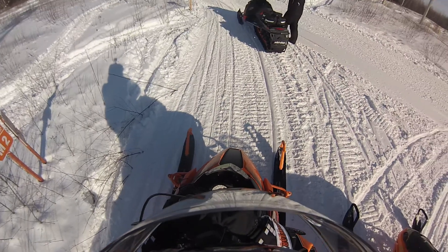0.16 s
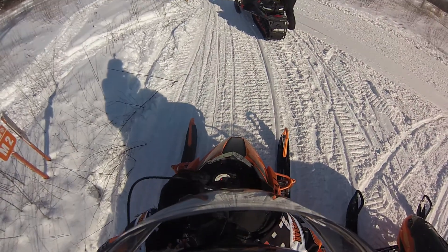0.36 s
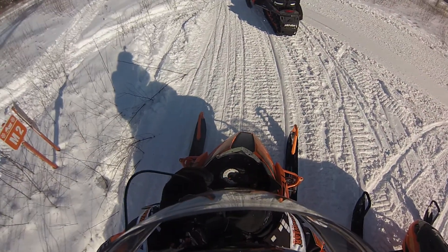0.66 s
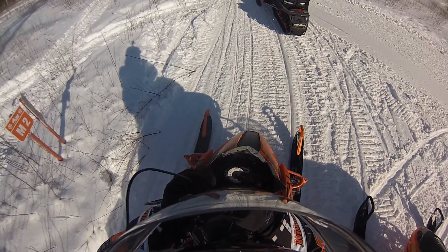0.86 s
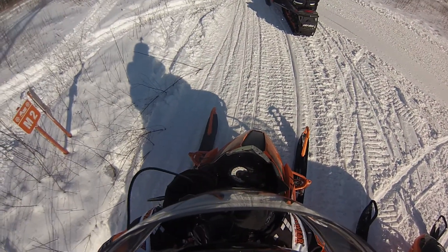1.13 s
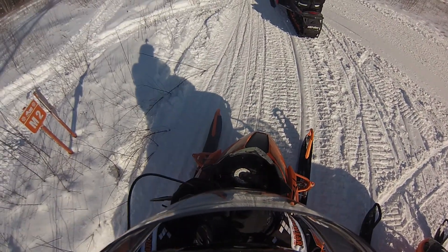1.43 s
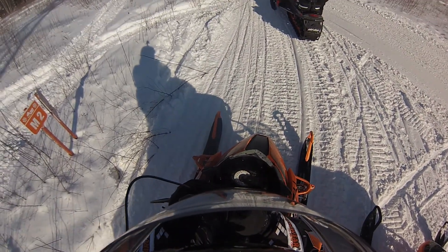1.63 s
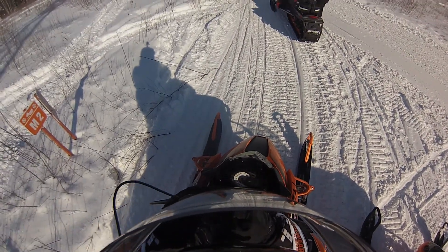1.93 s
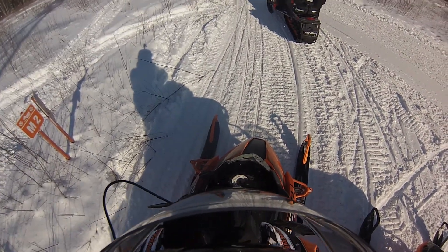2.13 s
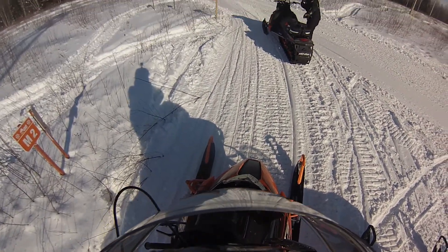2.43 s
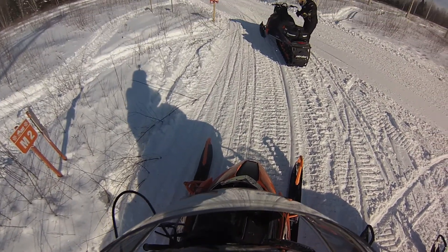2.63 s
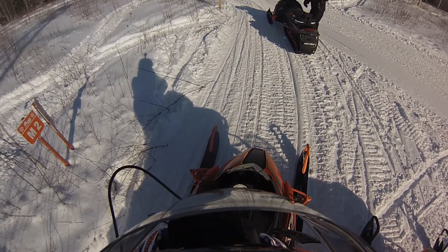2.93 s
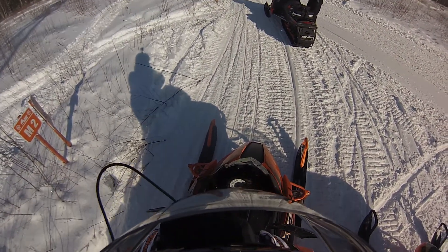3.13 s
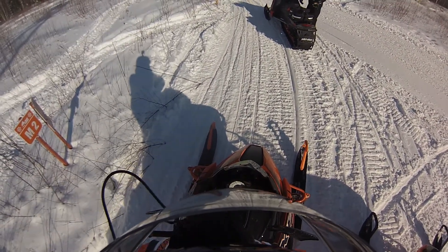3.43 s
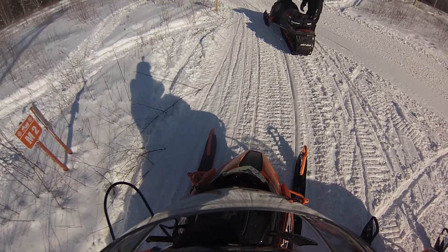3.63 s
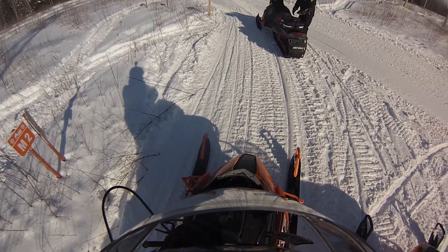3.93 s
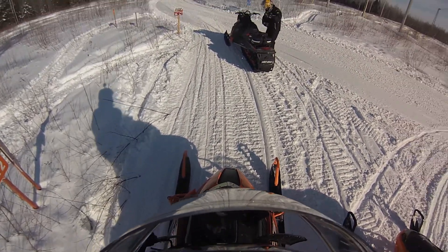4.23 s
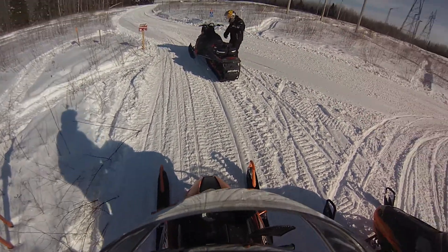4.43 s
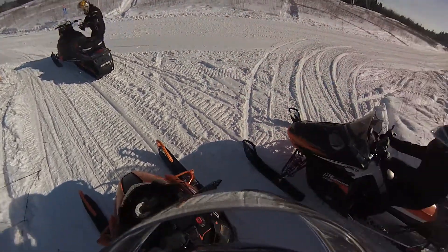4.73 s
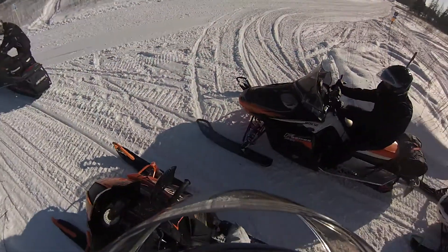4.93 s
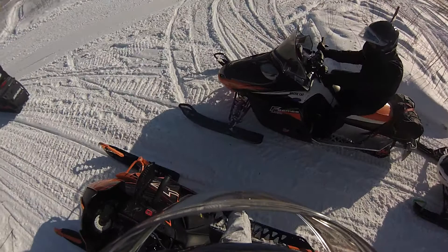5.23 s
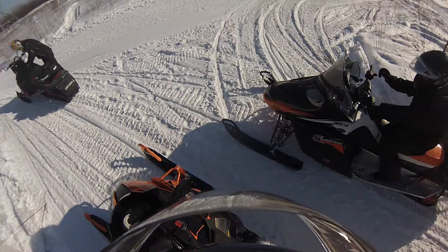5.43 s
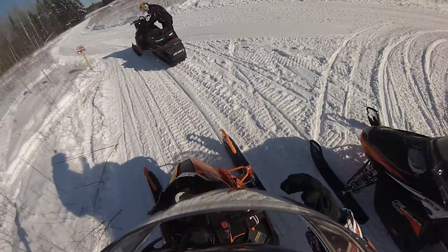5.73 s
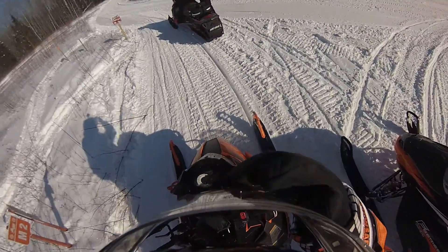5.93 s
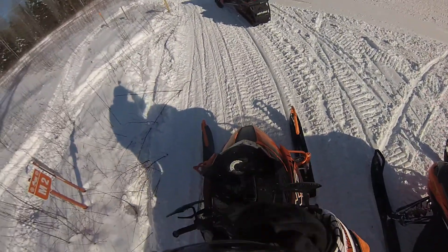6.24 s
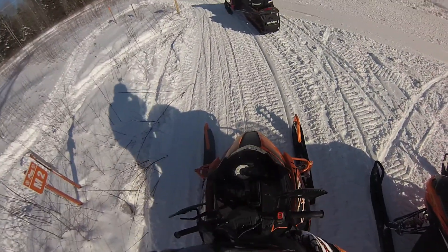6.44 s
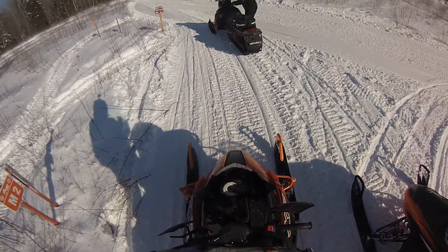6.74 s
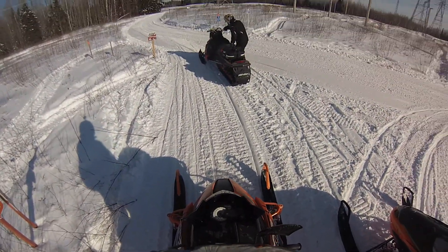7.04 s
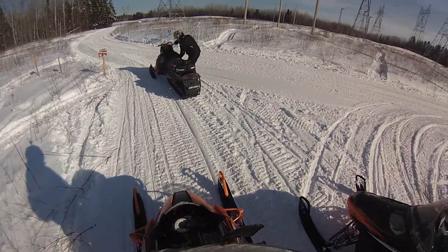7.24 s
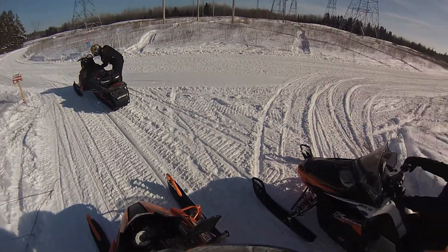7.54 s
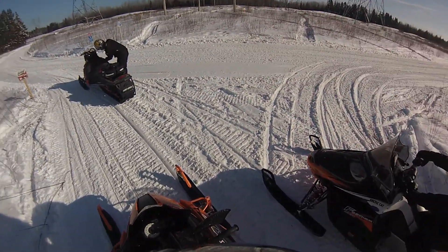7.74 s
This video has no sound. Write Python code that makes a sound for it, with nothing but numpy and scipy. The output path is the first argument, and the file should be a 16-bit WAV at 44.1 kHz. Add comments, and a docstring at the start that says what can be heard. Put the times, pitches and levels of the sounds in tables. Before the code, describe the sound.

Two snowmobiles idle with a low throb and metallic rattle, then a helmet visor ratchets down and snaps shut loudly, very close.

```python
"""On a trail, two snowmobiles idle, heard from a camera on one rider's helmet.
The rider's own engine throbs as exhaust pulses ring its pipe and silencer; a second machine clatters
and whines close by. The rider looks round, and stick-slip friction makes the helmet rub and judder on
the jacket. A hand takes the visor, rocking the camera mount, and pulls it down over its ratchet, each
tooth ringing the helmet shell, until it snaps shut. Then the rider looks round again."""
import sys
import numpy as np
from scipy import signal
from scipy.fft import rfft, irfft, next_fast_len
from scipy.io import wavfile
from scipy.ndimage import map_coordinates

SR = 44100
rng = np.random.default_rng(int(sys.argv[2]) if len(sys.argv) > 2 else 0)


def put_to_file(sound):
    """Save the sound as 16-bit audio at rate SR, in the file named by the first command-line argument."""
    columns = np.atleast_2d(sound).T  # one column per channel
    safe = np.clip(columns, -1, 1)
    whole_steps = np.round(safe * 32767)
    wavfile.write(sys.argv[1], SR, whole_steps.astype(np.int16))


N = 347067
TIME = np.arange(N) / SR


def gain_of(db):
    """Amplitude ratio: a factor of ten for every 20 dB."""
    return 10 ** (np.asarray(db) / 20)


def unit_rms(x):
    """Normalisation to a mean power of one."""
    return x / np.sqrt(np.mean(x ** 2) + 1e-20)


def follow(curve):
    """Linear interpolation of (time_s, value) points at every sample."""
    return np.interp(TIME, *np.transpose(curve))


def add(mix, start_s, sound):
    """Superposition: a sound sums into the mix from its start time."""
    part = mix[round(start_s * SR):][:len(sound)]
    part += sound[:len(part)]


def noise():
    """White Gaussian noise: equal power per hertz."""
    return rng.standard_normal(N)


def wander(rate_hz):
    """Slow random modulation of rms 1, interpolated between independent values."""
    knots = rng.standard_normal(2000)
    return unit_rms(map_coordinates(knots, [TIME * rate_hz], order=1, mode="wrap"))


def spectrum(points, hz):
    """Spectral envelope over log frequency, falling 24 dB an octave above its last point."""
    points_hz, db = np.transpose(points)
    octaves_above = np.maximum(np.log2((hz + 1) / points_hz[-1]), 0)
    return gain_of(np.interp(np.log(hz + 1), np.log(points_hz + 1), db) - 24 * octaves_above)


def colour(x, points, size=4096):
    """Minimum-phase filter of unit energy: by causality, nothing sounds before the blow."""
    hz = abs(np.fft.fftfreq(size, 1 / SR))
    log_gain = np.log(np.maximum(spectrum(points, hz), 1e-5))
    response = np.exp(np.conj(signal.hilbert(log_gain)))
    taps = np.fft.ifft(response).real[:size // 2]
    return signal.oaconvolve(x, taps / np.linalg.norm(taps))[:len(x)]


def ring(modes):
    """Free vibration: one second of exponentially damped modes."""
    t = TIME[:SR]
    return sum(gain_of(db - 60 * t / t60) * np.sin(2 * np.pi * hz * t) for hz, db, t60 in modes)


def struck(blows, modes):
    """Linear response: blows convolved with the impulse response of the modes."""
    return signal.oaconvolve(blows, ring(modes))[:N]


def strikes(turns, scatter_db):
    """Impulse train: one blow of uneven strength at each whole turn."""
    impulses = np.diff(np.floor(turns), prepend=np.floor(turns[0]))
    return impulses * gain_of(scatter_db * np.clip(noise(), -2, 2))


def pulses(turns, decay_turns):
    """Periodic envelope: a jump to 1 at each whole turn, then exponential decay."""
    return np.exp(-(turns % 1) / decay_turns)


def exhaust(cycles, drone_db=-51.5, puff_db=-77.0):
    """Interference: one hard beat a cycle rings the silencer against a pipe drone, so it throbs."""
    # pipe modes rung by the beat: pitch_hz, level_db, t60_s
    pipe_modes = [(154, -66.5, 0.058), (205, -83, 0.035), (252, -79.5, .063), (322, -79, .03),
                  (398, -79, .036)]
    # deep mode of the silencer: pitch_hz, level_db, t60_s
    silencer_modes = [(105.7, -45, 0.12)]
    # spectrum of the gas puff: frequency_hz, gain_db
    puff_spectrum = [(120, -26.5), (190, 13), (250, -1.5), (330, 7), (400, 8), (480, -29.5), (700, -27)]
    firing = cycles + .031
    beat_phase = firing + .04
    drone = np.cos(2 * np.pi * 10 * firing + .08 * wander(11))  # tenth harmonic of the cycle
    drone *= gain_of(drone_db + 0.57 * wander(8.5))
    throb = struck(strikes(firing, scatter_db=1.37), silencer_modes)
    beat = struck(strikes(beat_phase + .016 * wander(17), scatter_db=1.5), pipe_modes)
    puff = colour(noise() * (pulses(beat_phase, 0.084) + 0.48), puff_spectrum)
    return gain_of(puff_db) * unit_rms(puff) + drone + throb + beat


def panels(drive, modes):
    """Forced vibration: broad panel resonances filter a drive; the result has rms 1."""
    size = next_fast_len(N)
    hz = np.fft.rfftfreq(size, 1 / SR)
    power = sum(gain_of(db) ** 2 / (1 + ((hz - f) / width) ** 2) ** 2 for f, width, db in modes)
    return unit_rms(irfft(rfft(drive, size) * np.sqrt(power), size)[:N])


def panel_rattle(shaft_turns, own_db=-75.0):
    """Amplitude modulation: two knocks a shaft turn pulse the noise in both machines' panels."""
    # panel resonances of each machine: centre_hz, half_width_hz, gain_db
    own_panels = [(795, 110, -3), (1512, 50, -1), (1531, 68, 1), (2028, 145, -0.5), (2505, 49, -4.5),
                  (3134, 140, -27.5), (3430, 83, -18.5), (3910, 32, -21.5), (4540, 180, -27.5),
                  (4840, 70, -29.5)]
    neighbour_panels = [(354, 90, -1), (820, 140, -10.5), (1447, 76, 1.5), (1596, 75, 2), (2020, 257, -7.5),
                        (2490, 58, -5), (3370, 140, -8), (4660, 490, -20), (5240, 110, -24.5),
                        (6570, 210, -28), (7360, 950, -28)]
    # the neighbour's rattle at the helmet: time_s, level_db
    neighbour_level = [(4.1, -81), (4.4, -77), (4.8, -70), (5.5, -66), (7.87, -67)]
    knocks = pulses(shaft_turns, 0.2) + 0.98 * pulses(shaft_turns - .7, 0.18)
    knocks *= gain_of(wander(30))
    own = panels(noise() * (1 + 0.56 * knocks), own_panels)
    neighbour = panels(noise() * (1 + 0.83 * knocks), neighbour_panels)
    return gain_of(own_db + .5 * wander(4.6)) * own + gain_of(follow(neighbour_level)) * neighbour


def metal_clatter(cycles, shaft_turns):
    """Impact excitation: the rider's valve gear and the neighbour's pistons and tappets ring metal."""
    # modes of the struck parts: pitch_hz, level_db, t60_s
    valve_modes = [(2020, -73.5, 0.034), (2280, -78, 0.042), (2430, -87, 0.029)]
    piston_modes = [(1406, -75, 0.11), (1536, -72, 0.085), (3050, -83.5, .04)]
    tappet_modes = [(3285, -82.5, 0.048), (4184, -79.5, 0.033), (4930, -83, 0.0368)]
    # play in the parts lets blows land a little early or late
    valves = strikes(cycles - .81 + 0.0081 * wander(13), scatter_db=3)
    valves += 0.45 * strikes(cycles - .44, scatter_db=4.5)
    pistons = strikes(shaft_turns + .04 * wander(30), scatter_db=1.5)
    tappets = strikes(shaft_turns - .72 + .02 * wander(27), scatter_db=2.5)
    return struck(valves, valve_modes) + struck(pistons, piston_modes) + struck(tappets, tappet_modes)


def gear_whine(pitch_hz=803, waver_share=0.00993):
    """Frequency modulation: the neighbour's thin gear tone wavers about its pitch."""
    # strength of the whine: time_s, rms_db
    whine_level = [(0, -87.5), (4.5, -87.5), (5.4, -81), (7.87, -81)]
    turns = np.cumsum(pitch_hz * (1 + waver_share * wander(22))) / SR
    return np.sqrt(2) * gain_of(follow(whine_level) + 2 * wander(22)) * np.sin(2 * np.pi * turns)


def rumble(level_db=-60):
    """Broadband noise: the low rumble of the idling machines under a thin hiss."""
    # spectral density of rumble and hiss: frequency_hz, gain_db
    density = [(12, -18.5), (22, -2.5), (31, 0.5), (42, -13), (60, -17.5), (130, -7), (220, -32.5),
               (380, -35), (520, -39), (1100, -40), (2900, -47), (5300, -50), (6500, -54.5), (12700, -55.5)]
    shaped = irfft(rfft(noise()) * spectrum(density, np.fft.rfftfreq(N, 1 / SR)), N)
    return gain_of(level_db + 0.37 * wander(21)) * unit_rms(shaped)


def padding_bumps():
    """Damped resonance: light blows on the helmet padding ring two low, dull modes."""
    # blows on the padding: time_s, level_db
    bumps = [(0.936, -66.5), (1.453, -59.5)]
    # modes of the padding: pitch_hz, gain_db, t60_s
    padding_modes = [(259.7, 2.5, 0.13), (322, -8, 0.084)]
    blows = np.zeros(N)
    for time_s, db in bumps:
        add(blows, time_s, gain_of([db]))
    return struck(blows, padding_modes)


def click(t60_s, grit):
    """Contact transient: an impulse followed by exponentially decaying chatter."""
    t = TIME[:3000]
    burst = grit * rng.standard_normal(len(t)) * gain_of(-60 * t / t60_s)
    burst[0] += 1
    return burst


def camera_case(contact):
    """Structure-borne sound: resonances of the camera case sharpen whatever touches the helmet."""
    # case resonances, added to the direct sound: centre_hz, width_hz, gain_db
    resonances = [(1634, 190, 4), (1986, 130, 4), (4630, 223, 13), (5310, 150, 4.5), (6590, 180, 2),
                  (7900, 200, 0), (8980, 250, 8), (11800, 360, -7)]
    return contact + sum(gain_of(db) * signal.lfilter(*signal.iirpeak(hz, hz / width, fs=SR), contact)
                         for hz, width, db in resonances)


def fitting_ticks(ring_db=-13, ring_t60_s=0.022):
    """Light impacts: loose plastic fittings knock, each ringing briefly at its natural frequency; one sharp
    crackle of the jacket sounds alike."""
    # knocks of the fittings, and at 4.936 s a sharp crackle of the jacket: time_s, level_db, pitch_hz
    knocks = [(1.0855, -55, 3570), (2.221, -43.5, 2410), (2.797, -51, 2200), (3.5538, -51, 4700),
              (4.223, -51, 2080), (4.72, -49, 4650), (4.936, -40, 4540), (5.964, -47, 2050),
              (5.985, -44, 1570)]
    # spectrum of a knock: frequency_hz, gain_db
    knock_spectrum = [(300, -53), (1100, -47), (1500, 2.5), (2300, 14.5), (3100, 1), (3900, -7), (4700, -9),
                      (5500, -7), (6500, -11), (9000, -31), (13000, -10)]
    drive, rings = np.zeros((2, N))
    for time_s, db, hz in knocks:
        add(drive, time_s, gain_of(db) * click(t60_s=0.027, grit=0.22))
        add(rings, time_s, gain_of(db) * ring([(hz, ring_db, ring_t60_s)]))
    return camera_case(colour(drive, knock_spectrum)) + rings


def strokes(rows, swell_share=0.22, release_share=0.32):
    """Friction envelope: each stroke swells linearly, holds, then decays exponentially."""
    level = np.zeros(N)
    for start_s, length_s, db in rows:
        progress = (TIME - start_s) / length_s
        swell = np.clip(progress / swell_share, 0, 1)
        release = np.exp(-np.maximum(progress - 1, 0) / release_share)
        level += gain_of(db) * swell * release
    return level


def jacket_rub(grain_db=4.5, flutter_db=0.45):
    """Sliding friction: nylon threads fizz under the helmet and its padding scrapes the collar."""
    # strokes over the nylon and over the collar: start_s, length_s, level_db
    slides = [(4.71, 0.046, -61), (4.8, 0.38, -58), (5.958, 0.034, -62), (7.13, 0.22, -70)]
    scrapes = [(4.9, 0.13, -63.5), (5.03, 0.17, -67), (5.965, 0.048, -56.5), (7.13, 0.15, -62)]
    # friction spectra: frequency_hz, gain_db
    nylon_spectrum = [(200, 1.5), (500, -4.5), (1100, -7.5), (1500, -1), (1850, -3.5), (2450, -0.5),
                      (2800, -19.5), (3600, -7.5), (4200, -18), (4650, -17), (5100, -27), (7500, -24.5),
                      (10000, -34), (12000, -27), (14000, -40.5)]
    collar_spectrum = [(150, -23), (300, -2.5), (400, -2.5), (470, 7), (505, -11), (550, -16.5), (700, -20)]
    threads = noise() * gain_of(grain_db * np.minimum(rng.exponential(1, N), 6) + flutter_db * wander(90))
    fizz = strokes(slides) * unit_rms(camera_case(colour(threads, nylon_spectrum)))
    scrape = strokes(scrapes) * unit_rms(colour(noise(), collar_spectrum))
    return fizz + scrape


def helmet_judder(drag_hz=45.5, sway_hz=37.2, rise_db_per_s=100, fall_db_per_s=84):
    """Stick-slip oscillation builds as the head turns, then slows to the mount's free sway and dies."""
    # height of the judder at the end of each head turn: time_s, rms_db
    head_turns = [(5.162, -36), (7.365, -34.5)]
    judder = np.zeros(N)
    for peak_s, db in head_turns:
        t = TIME - peak_s
        dragging = .5 * (1 - np.tanh((t + .04) / .02))  # falls from 1 to 0 about 40 ms before the peak
        turns = np.cumsum(sway_hz + (drag_hz - sway_hz) * dragging) / SR
        turns -= np.interp(peak_s, TIME, turns)
        level_db = db + np.minimum(rise_db_per_s * t, -fall_db_per_s * t)
        judder += np.sqrt(2) * gain_of(level_db) * np.cos(2 * np.pi * turns)
    return judder


def mount_rocking():
    """Mass on a spring: the camera rocks on its mount after each push of the hand."""
    # pushes of the hand: start_s, level_db, rise_s
    pushes = [(6.008, -25.5, 0.034), (6.255, -11.5, 0.0225)]
    # modes of the mount: pitch_hz, gain_db, t60_s
    mount_modes = [(37.4, -2.5, 0.7), (44, 9, 0.15), (59.5, -12, 0.39), (83, -23, 0.2), (117.2, -27, 0.79)]
    rocking = np.zeros(N)
    for start_s, db, rise_s in pushes:
        onset = 1 - np.exp(-(TIME[:SR] / rise_s) ** 2)
        add(rocking, start_s, gain_of(db) * ring(mount_modes) * onset)
    return rocking


def visor(slip_db=-35.5, slip_edge_hz=3050, bite_s=.001, latch_s=6.3318):
    """Friction and impact: the visor rubs and skips over its ratchet, driving the shell, and latches."""
    # the visor skips over the teeth, catches, snaps home and rebounds: time_s, level_db
    clicks = [(6.2514, -20), (6.2616, -18.5), (6.275, -12.5), (6.2933, -15), (6.3054, -17.5),
              (6.3198, -17.5), (6.329, -11), (6.332, -6.5), (6.339, -20)]
    # response of the helmet shell: frequency_hz, gain_db
    shell_spectrum = [(90, -1.5), (200, 4.5), (340, -3), (450, 7), (600, -13.5), (1050, -12.5),
                      (1350, -7.5), (1520, 1), (1850, -4), (2250, -2.5), (2650, -12), (3100, -12.5),
                      (4500, -34), (6000, -34.5), (9000, -50.5), (14000, -62)]
    # lasting modes of the helmet: pitch_hz, gain_db, t60_s
    helmet_modes = [(153.8, -22, 0.16), (245.8, -22.5, 0.18), (312, -30, 0.08), (459, -25, 0.12),
                    (727, -33.5, 0.1), (1265, -29.5, 0.028)]
    # modes of the latch: pitch_hz, level_db, t60_s
    latch_modes = [(460, -27.5, 0.045), (1685, -15, 0.016), (2020, -12, .014),
                   (2280, -18, 0.012), (4850, -37, 0.011)]
    moving = (TIME > clicks[0][0]) & (TIME < clicks[-1][0])
    drive = gain_of(slip_db) * signal.lfilter(*signal.butter(2, slip_edge_hz, fs=SR), noise() * moving)
    blows, snap = np.zeros((2, N))
    for time_s, db in clicks:
        chatter = click(t60_s=0.02, grit=0.48)
        bite = 1 - .5 * np.exp(-TIME[:len(chatter)] / bite_s)
        add(drive, time_s, gain_of(db) * chatter * bite)
        add(blows, time_s, gain_of([db]))
    add(snap, latch_s, ring(latch_modes) * (1 - np.exp(-TIME[:SR] / bite_s)))
    return camera_case(colour(drive, shell_spectrum)) + struck(blows, helmet_modes) + snap


def scene(shaft_hz=30.6, hunt_share=.02):
    """Superposition: engines, jacket and helmet sum at one point."""
    # idle speed of the rider's engine in working cycles: time_s, rate_hz
    idle_speed = [(0.0, 12.081), (0.953, 11.354), (2.285, 11.72), (2.667, 11.35), (3.039, 11.951),
                  (3.823, 11.022), (4.733, 12.035), (6.301, 11.299), (7.87, 12.038)]
    cycles = np.cumsum(follow(idle_speed)) / SR
    shaft_turns = np.cumsum(shaft_hz * (1 + hunt_share * wander(1.6))) / SR  # the neighbour's idle hunts
    engines = exhaust(cycles) + panel_rattle(shaft_turns) + metal_clatter(cycles, shaft_turns)
    engines += gear_whine() + rumble()
    rider = padding_bumps() + fitting_ticks() + jacket_rub() + helmet_judder() + mount_rocking() + visor()
    return (engines + rider)[None]


def record(dry, edge_hz=12800):
    """Band limiting: the camera passes sound through a linear-phase low-pass filter."""
    taps = signal.firwin(511, edge_hz, window=("kaiser", 9), fs=SR)
    return signal.oaconvolve(dry, taps[None], "same")


dry = scene()
out = record(dry)
put_to_file(out)
```